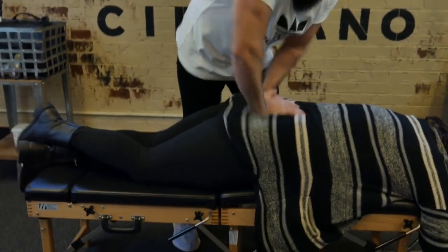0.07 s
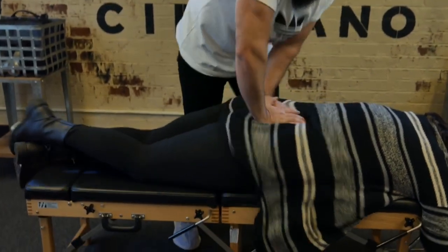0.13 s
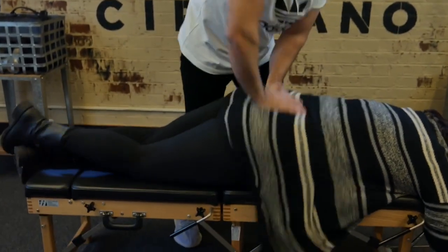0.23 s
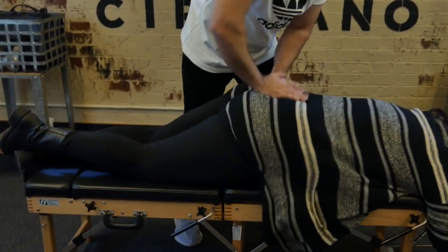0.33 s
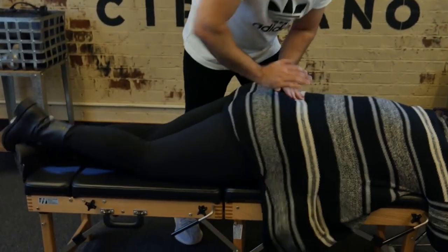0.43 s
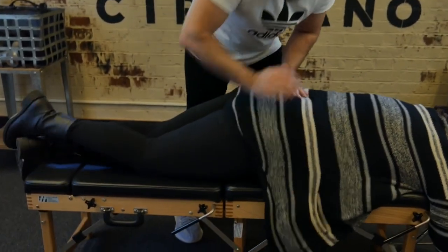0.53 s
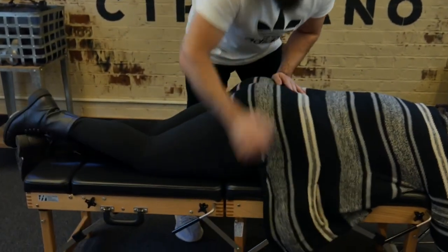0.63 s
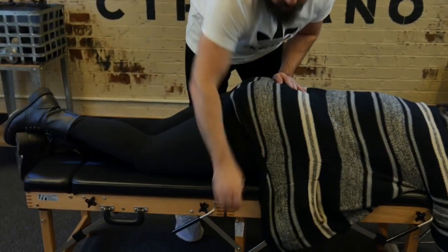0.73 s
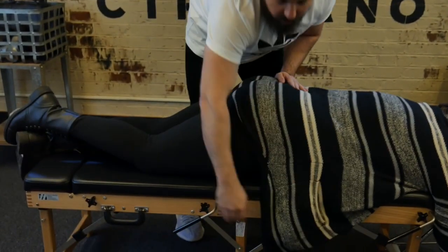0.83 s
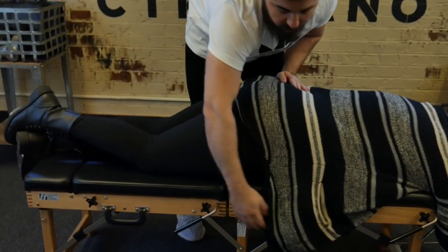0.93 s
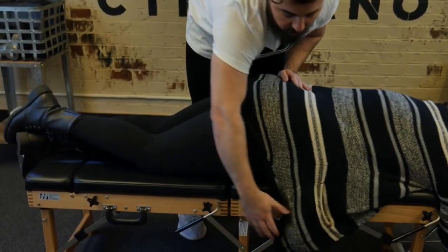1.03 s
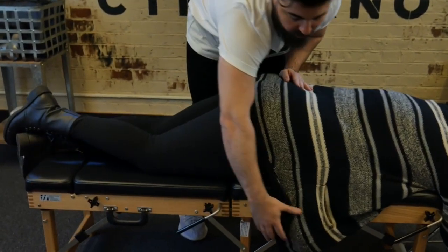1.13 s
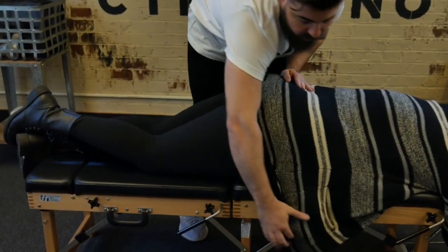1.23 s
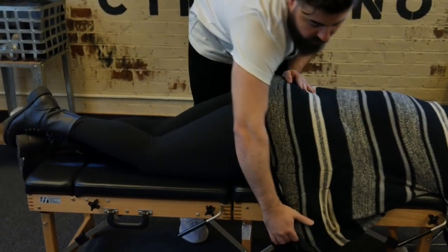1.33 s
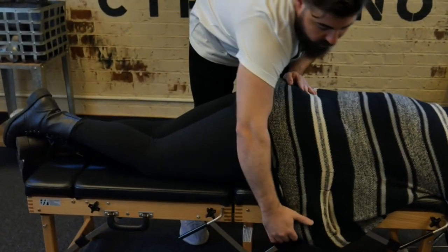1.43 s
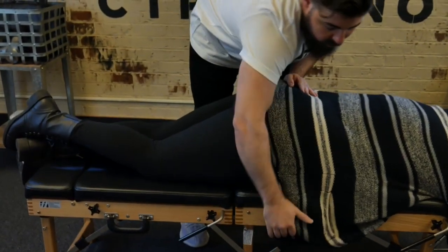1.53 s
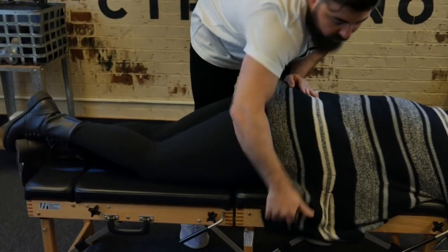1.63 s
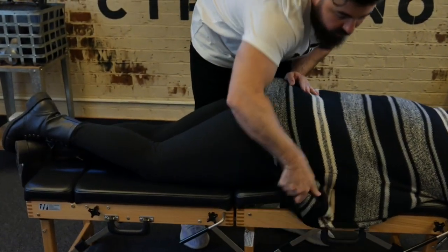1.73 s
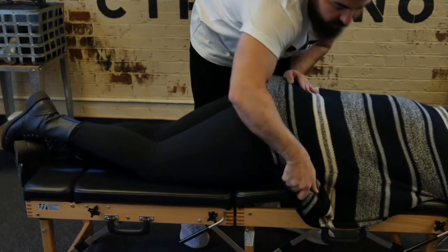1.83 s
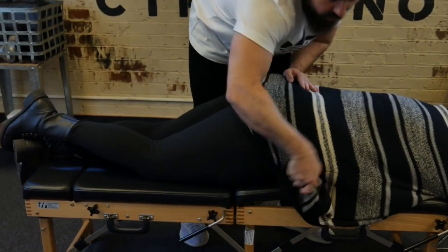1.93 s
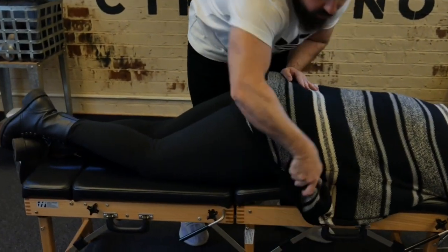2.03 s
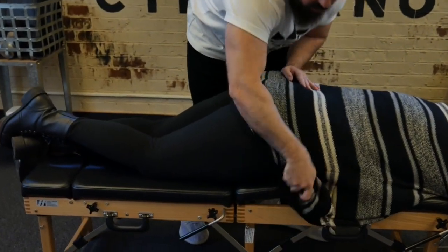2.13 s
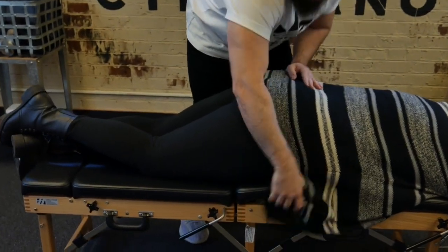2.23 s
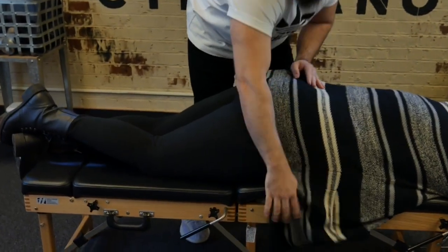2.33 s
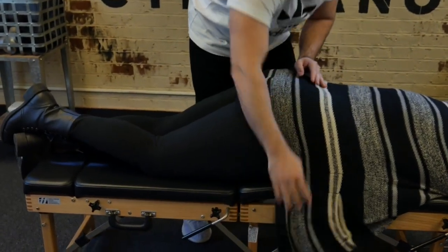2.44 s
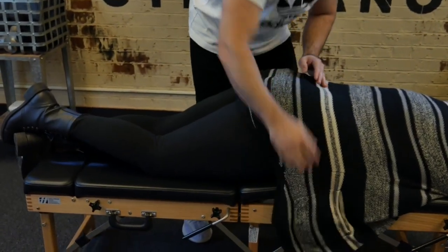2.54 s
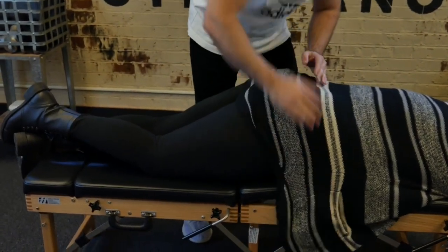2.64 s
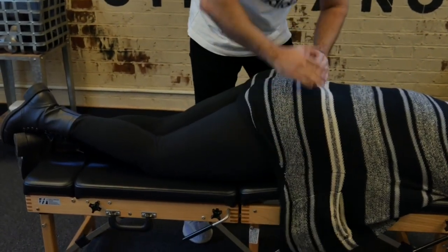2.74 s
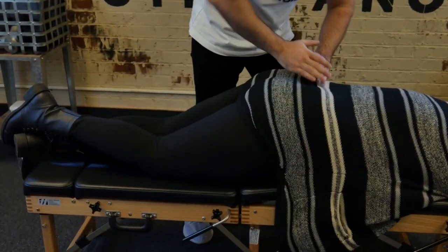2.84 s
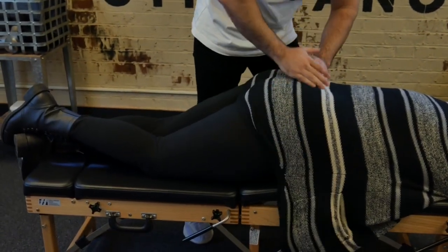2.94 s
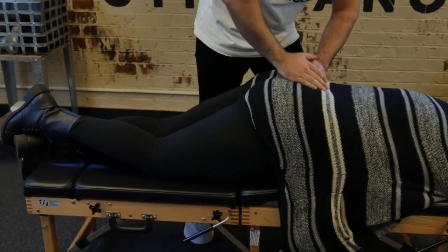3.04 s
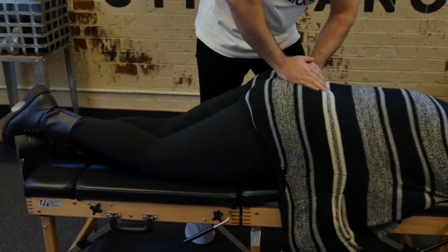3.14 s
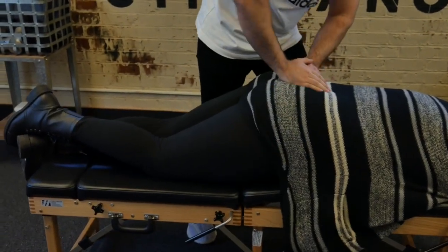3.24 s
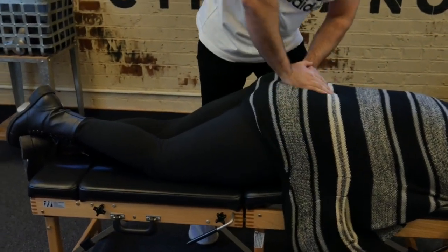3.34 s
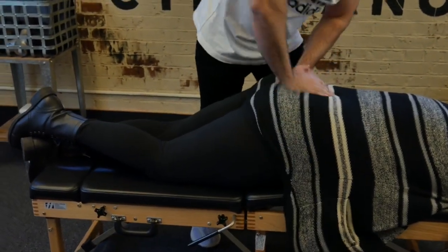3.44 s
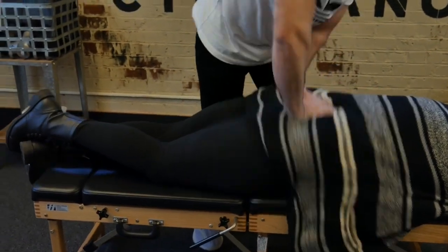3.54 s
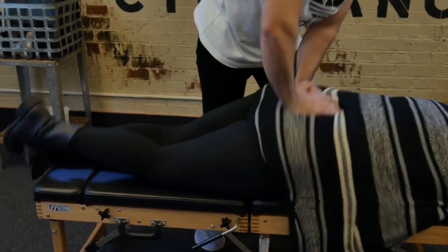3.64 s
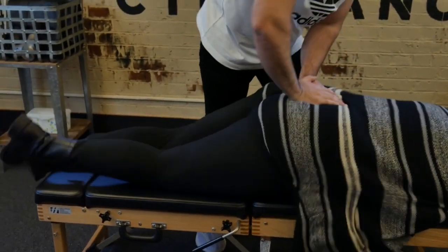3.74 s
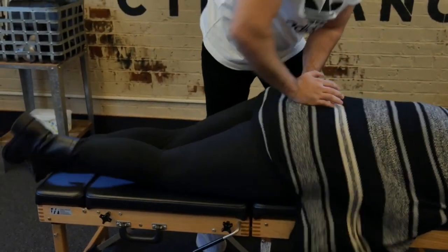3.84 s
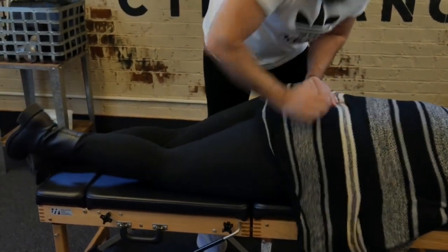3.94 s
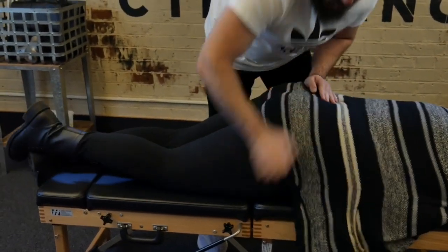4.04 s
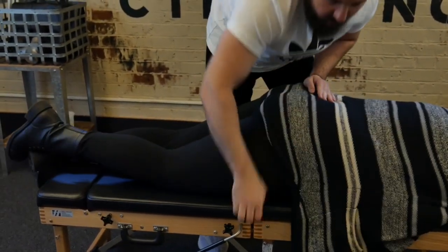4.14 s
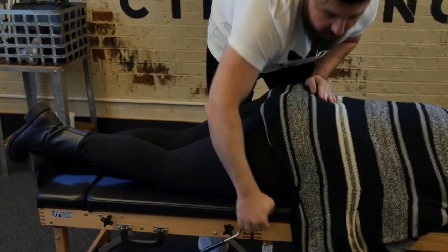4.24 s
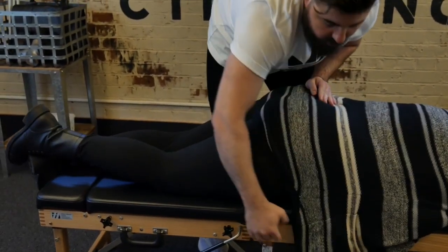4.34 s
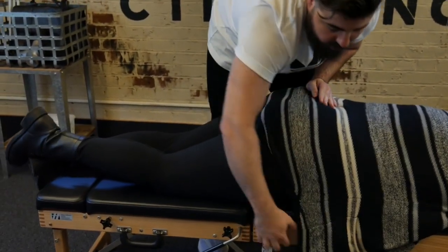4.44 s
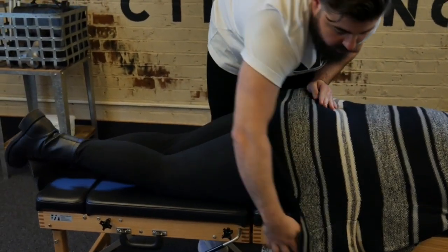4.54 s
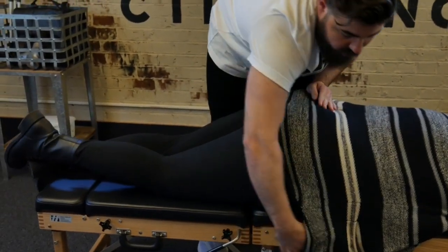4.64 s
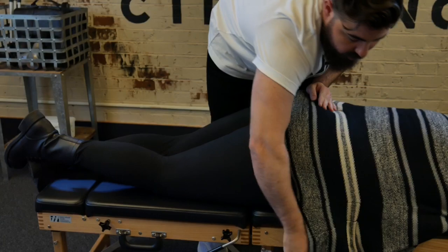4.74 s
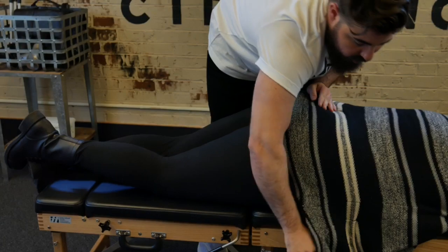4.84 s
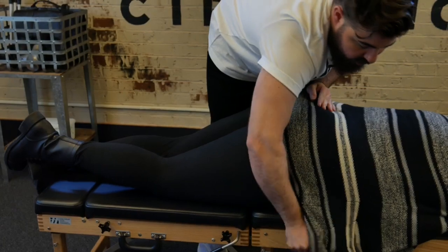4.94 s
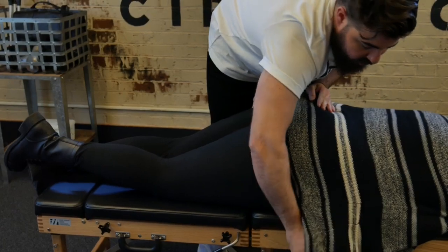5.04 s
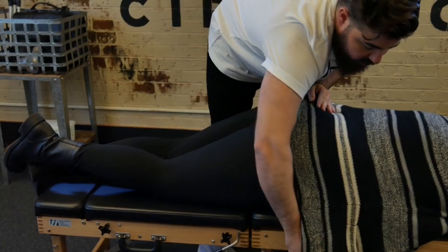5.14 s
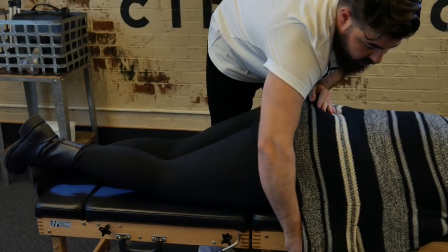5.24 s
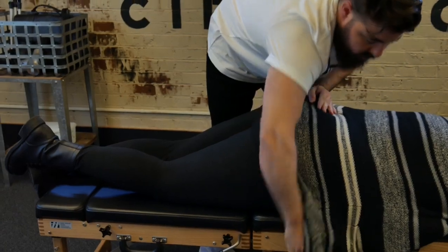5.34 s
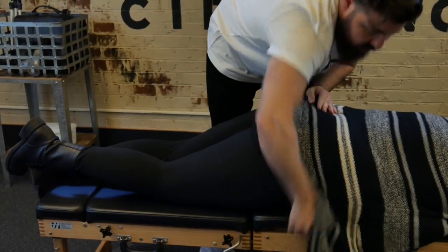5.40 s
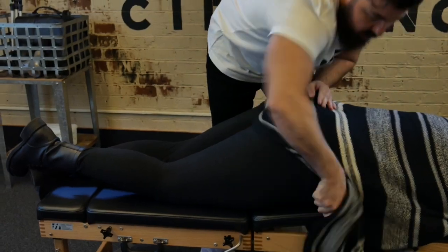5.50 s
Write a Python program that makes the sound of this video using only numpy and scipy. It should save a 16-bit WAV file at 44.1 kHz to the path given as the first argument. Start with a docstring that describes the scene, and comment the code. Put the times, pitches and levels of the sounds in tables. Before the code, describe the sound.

Two hard padded table drops, each a deep thump and sharp wood-and-steel clack, with lever clicks and a distant object bouncing between them.

```python
"""In a brick-walled room a chiropractor thrusts twice on a wooden drop table over soft ventilation.
Each drop is decaying cushion, frame and steel modes plus noise cracks: trip, thump, clack on the stop.
After each thrust he reaches under a blanket (swept noise, dull bumps) and works a clicking steel lever.
Further off a hard object knocks, falls and bounces, as modes driven by where it is struck.
Noise echo and standing waves ring on; a limiter ducks each drop and lets the echo swell back."""
import sys
import numpy as np
from scipy import signal
from scipy.fft import rfft, irfft, next_fast_len
from scipy.io import wavfile
from scipy.ndimage import uniform_filter1d

SR = 44100
rng = np.random.default_rng(int(sys.argv[2]) if len(sys.argv) > 2 else 0)


def wrap_up_sound(samples):
    """Save the sound to the file named by the first command line argument, as 16-bit audio."""
    columns = np.atleast_2d(samples).T
    # keep every value between -1 and 1, then stretch to whole-number steps
    tamed = np.clip(columns, -1, 1)
    steps = np.round(tamed * 32767).astype(np.int16)
    wavfile.write(sys.argv[1], SR, steps)


N = 245637


def undb(db):
    """Decibels to amplitude gain."""
    return 10 ** (np.asarray(db) / 20)


def unit_energy(x):
    """Scale a blow to the energy of 10 ms at rms 1."""
    return x * np.sqrt(SR / 100 / np.sum(x ** 2))


def fade(t_s, t60_s):
    """Exponential decay, 60 dB per t60."""
    return np.exp(-np.log(1000) * t_s / t60_s)


def add(track, start_s, sound):
    """Mix a sound in at start_s, cut at the end of the track."""
    start = int(start_s * SR)
    track[start:start + len(sound)] += sound[:N - start]


def colour(x, spectrum, tilt_db_per_oct=0):
    """Minimum-phase filter through (frequency [Hz], gain [dB]) points, tilted about 1 kHz."""
    n = 2 * next_fast_len(len(x))
    octave = np.log2(np.maximum(np.fft.rfftfreq(n, 1 / SR), 20))
    hz, db = np.transpose(spectrum)
    shape_db = np.interp(octave, np.log2(hz), db)
    tilt_db = tilt_db_per_oct * np.maximum(octave - np.log2(1000), -2)  # flat below 250 Hz
    cepstrum = irfft(np.log(undb(shape_db + tilt_db)))[:n // 2]
    cepstrum[1:] *= 2  # folded: causal
    response = np.exp(rfft(cepstrum, n))
    return irfft(rfft(x, n) * response)[:len(x)]


def walk(rate_hz):
    """Slow random wander: normal values at rate_hz, joined by straight lines."""
    steps = rng.standard_normal(1024)
    return np.interp(np.arange(N) / SR * rate_hz, np.arange(len(steps)), steps)


def ring(modes, tilt_db_per_oct=0, detune=0.0046, sign=-1):
    """Struck modes, detuned at each blow; neighbours start opposed (sign -1) or together (1)."""
    t = np.arange(SR // 4) / SR
    out = 0
    for k, (hz, db, t60_s) in enumerate(modes):
        pitch_hz = hz * (1 + detune * rng.standard_normal())
        gain = sign ** k * undb(db + tilt_db_per_oct * np.log2(hz / 1000))
        out = out + gain * np.sin(2 * np.pi * pitch_hz * t) * fade(t, t60_s)
    return unit_energy(out)


def crack(spectrum, t60_s, tilt_db_per_oct=0, rise_s=0.00054):
    """Dense, quickly damped vibration that spreads out from a contact."""
    t = np.arange(SR // 4) / SR
    swell = 1 - np.exp(-t / rise_s)
    burst = rng.standard_normal(len(t)) * swell * fade(t, t60_s)
    return unit_energy(colour(burst, spectrum, tilt_db_per_oct))


def radiate(x, edge_hz):
    """Small panels move too little air to carry deep bass."""
    return signal.sosfilt(signal.butter(2, edge_hz, "high", fs=SR, output="sos"), x)


# air rush spectrum: (frequency [Hz], relative level [dB])
AIR_SPECTRUM = [(15, -45), (25, -12), (92, -3.5), (161, -1), (242, 2), (301, -9), (344, -2.5), (405, -10.5),
                (607, -4), (714, -10.5), (1480, -12), (3720, -25.5), (4870, -30.5), (14800, -42.5),
                (16000, -65)]
# fan tones: (frequency [Hz], rms level [dB])
FAN_TONES = [(91.5, -58.5), (253, -57.5), (355, -60)]


def ventilation():
    """Coloured noise for the air rush, phase-wandering sines for the fan."""
    t = np.arange(N) / SR
    rush = colour(rng.standard_normal(N), AIR_SPECTRUM)
    rush_db = -47.4 + 0.2 * walk(3.7)
    hum = 0
    for hz, db in FAN_TONES:
        hum = hum + undb(db) * np.sqrt(2) * np.sin(2 * np.pi * hz * t + 2.67 * walk(7))
    return rush / rush.std() * undb(rush_db) + hum


# diffuse echo: (frequency [Hz], relative level [dB], t60 [s])
ECHO_BANDS = [(40.3, -21, 1.0), (84, 4.5, 1.0), (131, -9.5, 0.4), (242, 2, 0.99), (468, 2.5, 0.67),
              (765, 2.5, 0.71), (1500, 3, 0.61), (2930, 0.5, 0.52), (5900, -2, 0.43), (9900, -3, 0.29),
              (16000, 1.5, 0.21)]


def room(x, build_s=0.0035):
    """Diffuse echo: half-octave noise bands build up over the first reflections; treble dies first."""
    t = np.arange(3 * SR // 2) / SR
    hz, db, t60_s = np.transpose(ECHO_BANDS)
    noise = rfft(rng.standard_normal(len(t)))
    octave = np.log2(np.maximum(np.fft.rfftfreq(len(t), 1 / SR), 20))
    echo = 0
    for centre in np.arange(5, 14.5, 0.5):
        share = np.clip(1 - 2 * abs(octave - centre), 0, 1)
        gain = undb(np.interp(centre, np.log2(hz), db))
        decay = fade(t, np.interp(centre, np.log2(hz), t60_s))
        echo = echo + irfft(noise * share, len(t)) * gain * decay
    echo = echo * (1 - np.exp(-(t / build_s) ** 2)) / np.sqrt(SR / 20)
    return signal.fftconvolve(x, echo)[:N]


# standing waves between the walls: (frequency [Hz], relative level [dB], t60 [s])
STANDING_WAVES = [(220, 3.5, 1.2), (228, -0.5, 0.82), (260, 1.5, 1.73), (268, 2, 1.18), (287, 4, 1.3),
                  (380, -9, .9), (439, -7.5, 2.06)]


def boom(x):
    """Standing waves hum on after a blow, each at its own phase."""
    t = np.arange(3 * SR // 2) / SR
    waves = 0
    for hz, db, t60_s in STANDING_WAVES:
        waves = waves + undb(db) * np.sin(2 * np.pi * (hz * t + rng.random())) * fade(t, t60_s)
    return signal.fftconvolve(x, waves)[:N]


# hand and sleeve on the blanket: (time [s], half length [s], level [dB], tilt [dB/octave])
HAND_SWEEPS = [(0.912, 0.034, -59, 7.5), (1.167, 0.18, -64.5, 5), (1.662, 0.093, -56, -3),
               (4.279, 0.017, -59.5, 6), (4.653, 0.12, -63.5, 7), (5.439, 0.055, -43.5, -6)]
# blanket stretched, then creased: (lead before landing [s], half length [s], level [dB], tilt [dB/octave])
THRUST_CREASES = [(0.043, 0.077, -57, -2.5), (0.002, 0.024, -38.5, -2)]
# fibre noise: (frequency [Hz], relative level [dB])
CLOTH_SPECTRUM = [(200, 0), (1000, 6.5), (3000, 6), (5500, 7.5), (8000, -2.5), (13000, -3), (16000, -15)]


def blanket():
    """Fibres catch and slip: noise of uneven strength under a bell envelope per sweep or thrust."""
    out = np.zeros(N)
    strokes = list(HAND_SWEEPS)
    for land_s, *_ in DROPS:
        strokes += [(land_s - lead_s, half_s, db, tilt) for lead_s, half_s, db, tilt in THRUST_CREASES]
    for centre_s, half_s, db, tilt in strokes:
        t = np.arange(SR) / SR + max(centre_s - 0.5, 0)
        slips = rng.standard_normal(SR) * undb(2.0 * rng.standard_normal(SR))
        fibres = colour(slips, CLOTH_SPECTRUM, tilt)
        envelope = np.exp(-((t - centre_s) / half_s) ** 2 / 2)
        add(out, t[0], undb(db) * fibres / fibres.std() * envelope)
    return out * undb(0.7 * walk(45))


# firm bumps of the arm on the padding: (time [s], level [dB])
FIRM_BUMPS = [(0.987, -44), (1.699, -37), (1.972, -33), (2.234, -35)]
# arm gropes for the lever: (start [s], end [s], mean level of soft bumps [dB])
ARM_REACHES = [(0.897, 1.901, -49.5), (4.2, 5.25, -50)]
# padded contact: (frequency [Hz], relative level [dB])
PADDING_SPECTRUM = [(30, -26), (60, -17), (130, -16), (300, 0.5), (500, -2.5), (900, -16.5), (2000, -22.5),
                    (8000, -51)]


def bumps(count=5):
    """Dull damped noise bursts: a few firm contacts, and count soft ones scattered over each reach."""
    out = np.zeros(N)
    contacts = list(FIRM_BUMPS)
    for start_s, end_s, db in ARM_REACHES:
        times_s = start_s + (end_s - start_s) * (np.arange(count) + rng.random(count)) / count
        contacts += zip(times_s, db + 3.5 * rng.standard_normal(count))
    for contact_s, db in contacts:
        add(out, contact_s, undb(db) * crack(PADDING_SPECTRUM, t60_s=0.14))
    return out


# far object: (frequency [Hz], relative level [dB], t60 [s])
OBJECT_MODES = [(137, -3, 0.13), (186, 4, 0.073), (442, -3, 0.33), (720, -1, 0.34), (937, -5, 0.098),
                (1151, -2, 0.11), (1194, -2.5, 0.067), (1296, 3.5, 0.098), (1430, -9.5, 0.093),
                (1830, 3, 0.06), (2153, -4, 0.07), (2298, -2, 0.097), (2390, -3, 0.051), (2636, -4, 0.063),
                (3070, -8, 0.076)]
# its dense body vibration: (frequency [Hz], relative level [dB])
OBJECT_SPECTRUM = [(40, -40.5), (100, -0.5), (200, -6), (330, -1.5), (500, 0.5), (800, 2.5), (1100, 1.5),
                   (1400, 0.5), (1900, -7.5), (2500, -11.5), (4000, -20.5), (7000, -55), (16000, -55)]
# its contact tick: (frequency [Hz], relative level [dB])
TICK_SPECTRUM = [(200, -5), (1000, -13), (2300, 1.5), (3200, 4.5), (4500, -7.5), (6200, -6), (8000, -21),
                 (12000, -29.5), (16000, -35)]


def knock(tilt, tick_db, spot_hz, favour_db=8, favour_octaves=0.22):
    """Hard contact: the struck spot drives modes near spot_hz harder than the rest."""
    driven = []
    for hz, db, t60_s in OBJECT_MODES:
        favour = np.exp(-(np.log2(hz / spot_hz) / favour_octaves) ** 2)
        driven.append((hz, db + favour_db * favour, t60_s))
    modes = undb(-4) * ring(driven, tilt, detune=0.0034)
    body = undb(-1.5) * crack(OBJECT_SPECTRUM, 0.045, tilt, rise_s=0.003)
    tick = undb(tick_db) * crack(TICK_SPECTRUM, t60_s=0.045)
    return modes + body + tick


# single knocks: (time [s], relative level [dB], tilt [dB/octave], relative tick level [dB], favoured frequency [Hz])
SINGLE_KNOCKS = [(1.476, -35, -1.5, -29, 1300), (2.283, -29, -1, -21, 2560), (5.332, -31, 0.5, -30, 1320)]
# contacts per landing, one end, the other, then rattle and rocking: (delay [s], relative level [dB],
# loss per bounce [dB], tilt [dB/octave], relative tick level [dB], favoured frequency [Hz])
LANDING_CONTACTS = [(0, -21.5, 2, 3.5, -7, 1200), (0.009, -22, 0, 0.5, -19.5, 1400),
                    (0.014, -26.5, 1.2, 1.5, -23, 2200), (0.036, -22, 4, -3.5, -25, 740)]
FALL_S, FIRST_FLIGHT_S, RESTITUTION = 2.4115, 0.222, 0.75  # each flight is a share of the one before
FADE_DB = 0.9  # times bounce number squared
TICK_LOSS_DB, TILT_LOSS_DB_PER_OCT = 5.5, 0.81  # per bounce


def far_knocks(landings=6):
    """A hard object is knocked, falls, then bounces end over end, ever faster, softer and duller."""
    out = np.zeros(N)
    for knock_s, db, tilt, tick_db, spot_hz in SINGLE_KNOCKS:
        add(out, knock_s, undb(db) * knock(tilt, tick_db, spot_hz))
    land_s = FALL_S
    for k in range(landings):
        for delay_s, db, loss_db, tilt, tick_db, spot_hz in LANDING_CONTACTS:
            gain = undb(db - loss_db * k - FADE_DB * k ** 2)
            contact = knock(tilt - TILT_LOSS_DB_PER_OCT * k, tick_db - TICK_LOSS_DB * k, spot_hz)
            add(out, land_s + delay_s, gain * contact)
        land_s += FIRST_FLIGHT_S * RESTITUTION ** k
    return radiate(out, edge_hz=39)


# cushion: (frequency [Hz], relative level [dB], t60 [s])
CUSHION_MODES = [(153.8, -1.5, 0.1), (199.6, 2.5, 0.044), (272, -6.5, 0.04), (363.4, -16, 0.087)]


def cushion_thump():
    """Low, short padding modes, all starting together."""
    return ring(CUSHION_MODES, sign=1)


# wooden frame: (frequency [Hz], relative level [dB], t60 [s])
FRAME_MODES = [(341, 1, 0.027), (444, 4.5, 0.063), (499.5, -1, 0.085), (637, -27, .04),
               (709.4, -4.5, 0.058), (1066, -9, 0.017), (1290, -23, 0.078), (1670, -14, 0.15),
               (1980, -18, 0.01)]
# its dense vibration: (frequency [Hz], relative level [dB])
FRAME_SPECTRUM = [(40, -18), (90, -1), (200, 1), (450, 4.5), (800, -3.5), (1300, -2.5), (2200, -9.5),
                  (4000, -24.5), (8000, -39), (16000, -51)]


def frame_blow():
    """Clack of the wooden frame: mostly dense damped vibration, some clear modes."""
    modes = undb(-10.5) * ring(FRAME_MODES, detune=0.0066)
    return modes + undb(-1.0) * crack(FRAME_SPECTRUM, t60_s=0.053, rise_s=0.00047)


# steel latch: (frequency [Hz], relative level [dB], t60 [s])
STEEL_MODES = [(2566, -17.5, 0.062), (2840, -13.5, .03), (3320, -23.5, 0.014), (3764, 12.5, 0.046),
               (4800, -3.5, .06), (5310, -4, 0.15), (5580, 10, 0.022), (6200, 7.5, 0.021),
               (10530, -14, 0.1)]
# its dense vibration: (frequency [Hz], relative level [dB])
STEEL_SPECTRUM = [(200, -28), (1000, -3.5), (1900, -3), (2700, 4), (3600, 5), (4300, -1.5), (5300, 0),
                  (6500, -3.5), (7800, -12.5), (10500, -12.5), (13000, -17), (16000, -30.5)]


def steel_blow(tilt, t60_s):
    """Snap of the steel latch: bright dense vibration over weaker modes."""
    modes = undb(-17.5) * ring(STEEL_MODES, tilt, detune=0.0053)
    return modes + undb(-5) * crack(STEEL_SPECTRUM, t60_s, tilt, rise_s=0.0014)


# lever and latch: (time [s], frame level [dB], steel level [dB], steel tilt [dB/octave])
LEVER_CLICKS = [(0.055, -38, -40.5, -2.5), (1.5549, -44, -39.5, 0), (1.597, -42, -31.5, -4.5),
                (1.837, -64, -31.5, -4.5), (1.969, -26.5, -32, -0.5), (2.14, -30.5, -32, -9),
                (3.502, -41, -36, -4), (4.19, -39.5, -47, 2.5), (4.458, -43.5, -46.5, 6),
                (5.216, -46.5, -65, -9), (5.3215, -34, -42, 3.5), (5.369, -57, -36.5, 1),
                (5.3923, -33, -35, -0.5)]
# latch spring: (frequency [Hz], relative level [dB], t60 [s])
SPRING_MODES = [(2780, -12, 0.061), (4750, -6, 0.039), (5200, 8, 0.036), (5300, -5, 0.037),
                (5760, 5, 0.028), (10070, -5, 0.072)]
CLICK_T60_S, CLICK_REF_DB, CLICK_DOUBLING_DB = 0.018, -35, 5  # harder clicks chatter longer
LIFT_S, COCKED_S = 5.339, 5.498
PAWL_LEAD_S, SEAT_LAG_S = 0.0118, 0.00294  # relative to COCKED_S


def lever():
    """Frame and steel ticks under the hand; a cushion lift; pawl slip, catch and seat as it cocks."""
    out = np.zeros(N)
    for click_s, frame_db, steel_db, tilt in LEVER_CLICKS:
        t60_s = CLICK_T60_S * 2 ** ((max(frame_db, steel_db) - CLICK_REF_DB) / CLICK_DOUBLING_DB)
        add(out, click_s, undb(frame_db) * frame_blow() + undb(steel_db) * steel_blow(tilt, t60_s))
    add(out, LIFT_S, undb(-32) * cushion_thump())
    pawl_slip = undb(-23) * frame_blow() + undb(-15) * steel_blow(0, t60_s=0.026)
    catch = undb(-13) * steel_blow(5.5, t60_s=0.022) + undb(-21) * ring(SPRING_MODES, detune=0)
    add(out, COCKED_S - PAWL_LEAD_S, pawl_slip)
    add(out, COCKED_S, catch)
    add(out, COCKED_S + SEAT_LAG_S, undb(-16) * frame_blow())
    return out


# thrusts: (landing time [s], landing-to-stop travel [s], force [dB], added steel tilt [dB/octave])
DROPS = [(0.1123, 0.0149, 0, 1.5), (3.54, 0.0131, 0.5, -0.3)]
# trip, land, rebound, stop, latch: (share of travel time [1], relative cushion level [dB],
# relative frame level [dB], relative steel level [dB], base steel tilt [dB/octave])
STAGES = [(-0.19, -26, -14.5, -14.5, 1.5), (0, 10, 3.5, -2.5, -0.5), (0.39, -5.5, -4, -7, 5),
          (1, -9, 5.5, 1, -0.7), (1.121, -14.5, 4.5, -4, 5)]
SETTLE_S = 0.281  # after landing


def drops():
    """The loaded section falls: cushion thumps, frame and latch clack, then the body settles."""
    out = np.zeros(N)
    for land_s, travel_s, force_db, bright in DROPS:
        for share, cushion_db, frame_db, steel_db, tilt in STAGES:
            thump = undb(cushion_db) * cushion_thump()
            clack = undb(frame_db) * frame_blow()
            snap = undb(steel_db) * steel_blow(tilt + bright, t60_s=0.041)
            add(out, land_s + share * travel_s, undb(force_db) * (thump + clack + snap))
        settle = undb(-17.5) * cushion_thump() + undb(-39) * frame_blow()
        add(out, land_s + SETTLE_S, settle)
    return radiate(out, edge_hz=150)


def scene(walls=2):
    """The table is near and fairly dry; more of the far knocks arrives as echo."""
    cloth = blanket() + bumps()
    direct = drops() + lever() + undb(2.5) * far_knocks() + cloth
    echo = 0
    for _ in range(walls):
        # a blow radiates a different fine spectrum to each wall: smoother echo
        sent = undb(-5) * drops() + undb(-0.5) * lever() + undb(4.0) * far_knocks() + cloth
        echo = echo + room(sent)
    mix = direct + echo / np.sqrt(walls) + undb(-78) * boom(direct) + ventilation()
    return mix[None]


def limiter(x, top_db, release_db_per_s, size=88):
    """Ducks at once when the level passes the top, then recovers at a steady dB rate."""
    level_db = 10 * np.log10(np.maximum(uniform_filter1d(x ** 2, size), 1e-12))
    excess_db = np.maximum(level_db - top_db, 0)
    recovery_db = release_db_per_s * np.arange(N) / SR
    duck_db = np.maximum.accumulate(excess_db + recovery_db, axis=-1) - recovery_db
    return x * undb(-uniform_filter1d(duck_db, size))


def record(dry):
    """Limits the drops, clips what slips through, low-passes at 15.5 kHz."""
    held = np.clip(limiter(dry, top_db=-6.5, release_db_per_s=59), -1, 1)
    return signal.sosfilt(signal.ellip(8, 0.2, 70, 15500, fs=SR, output="sos"), held)


dry = scene()
out = record(dry)
wrap_up_sound(out)
```